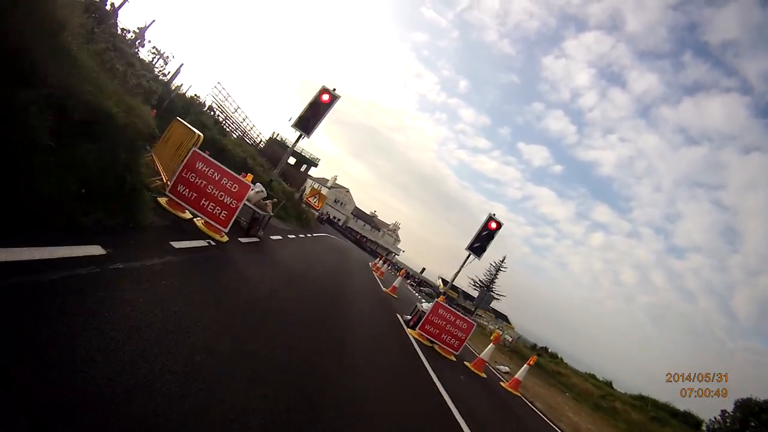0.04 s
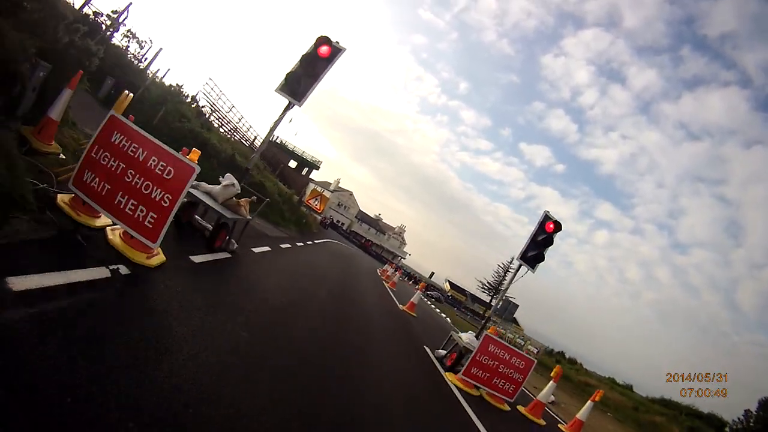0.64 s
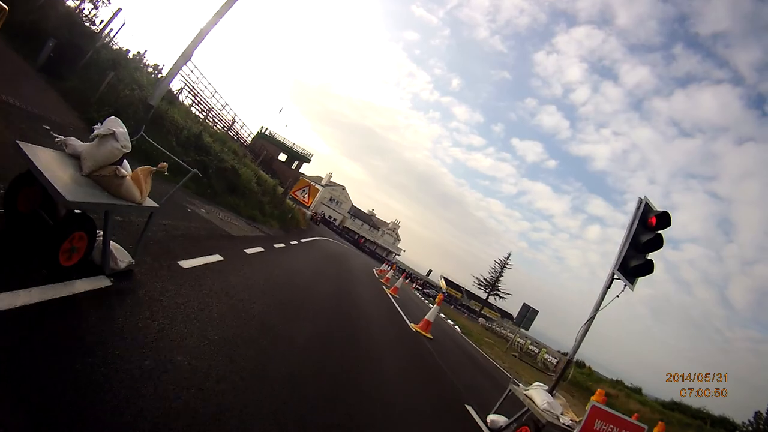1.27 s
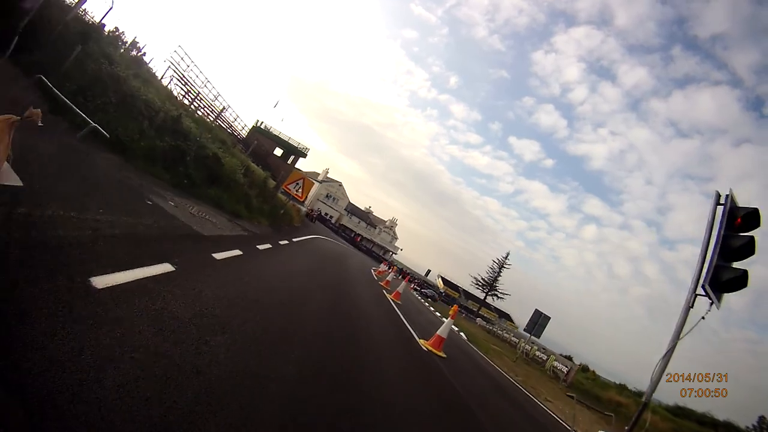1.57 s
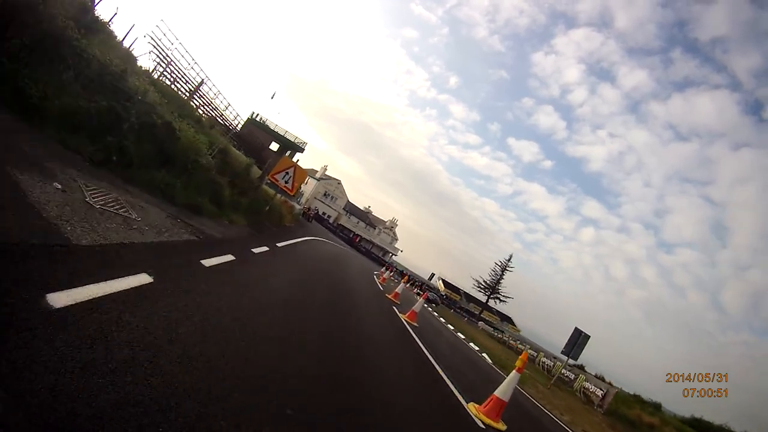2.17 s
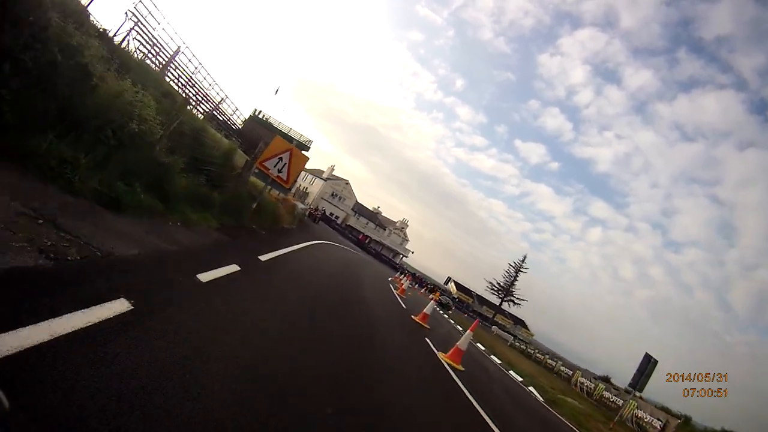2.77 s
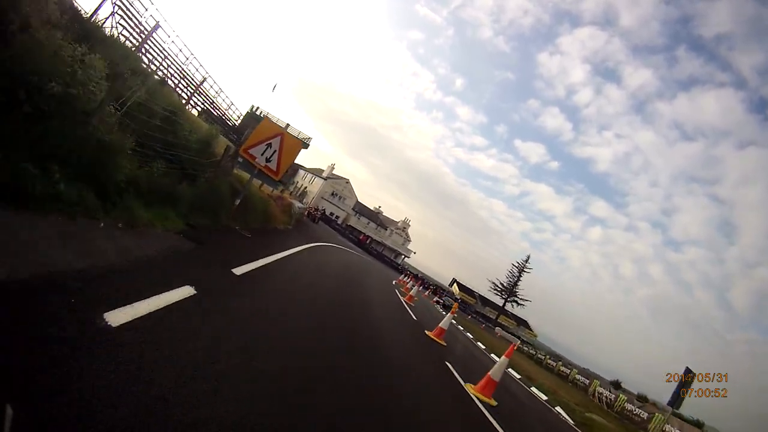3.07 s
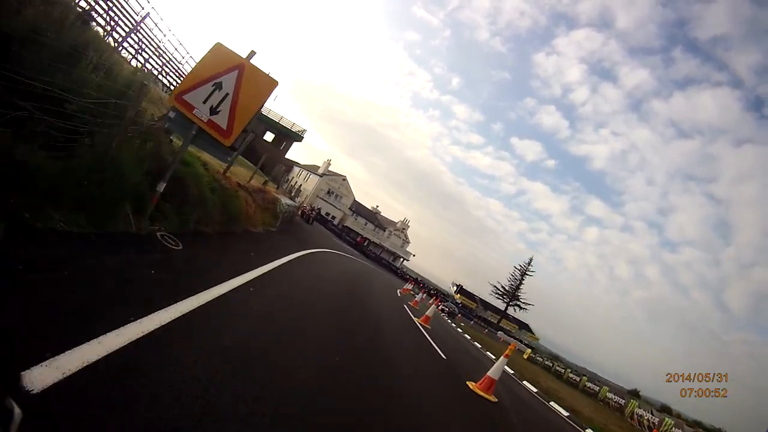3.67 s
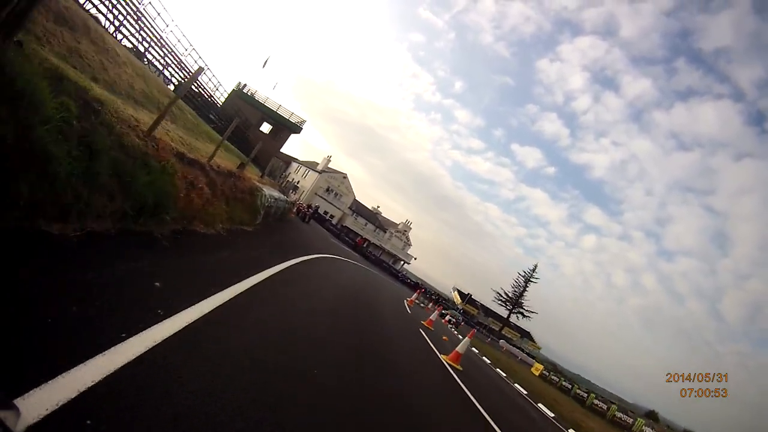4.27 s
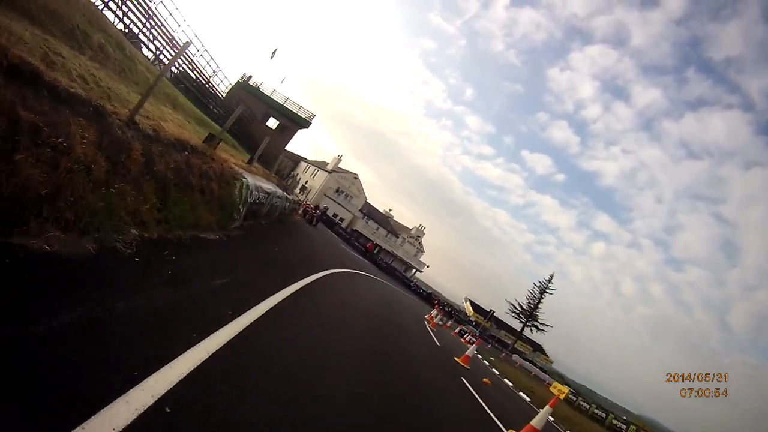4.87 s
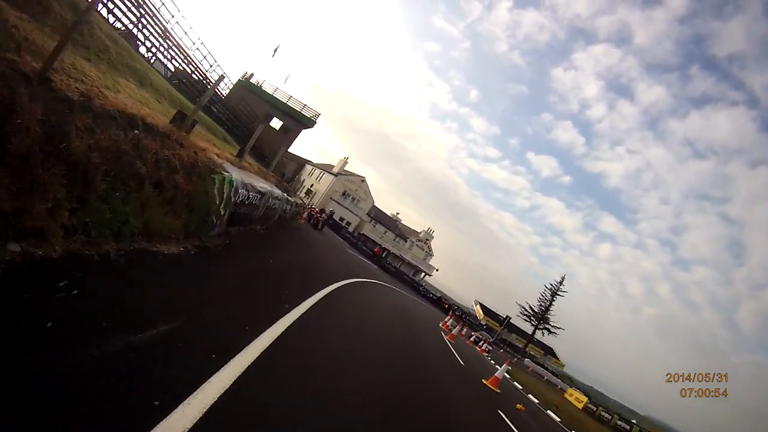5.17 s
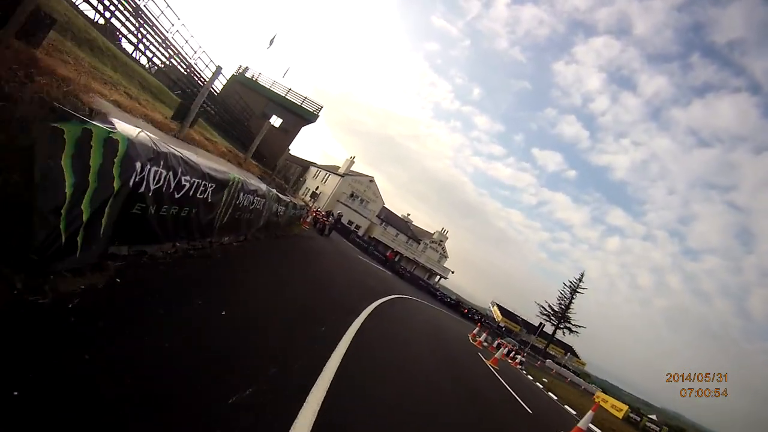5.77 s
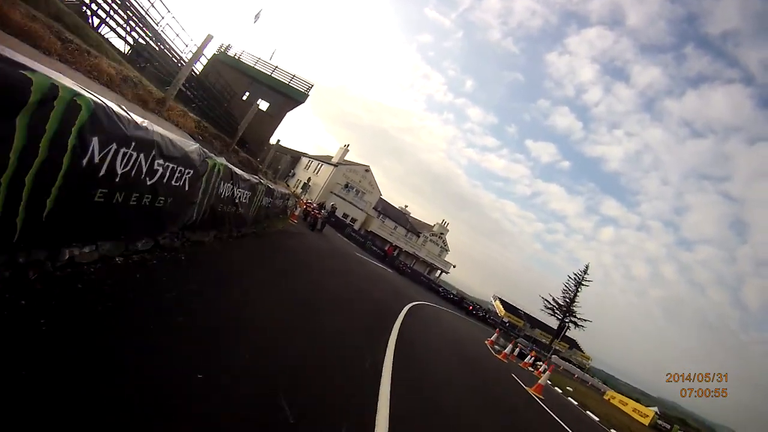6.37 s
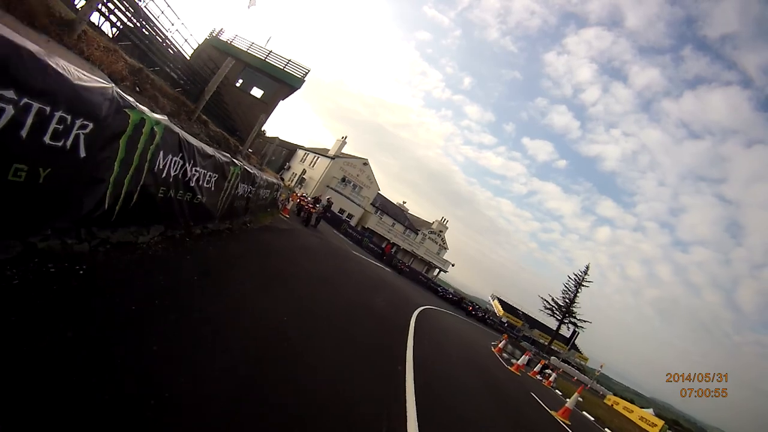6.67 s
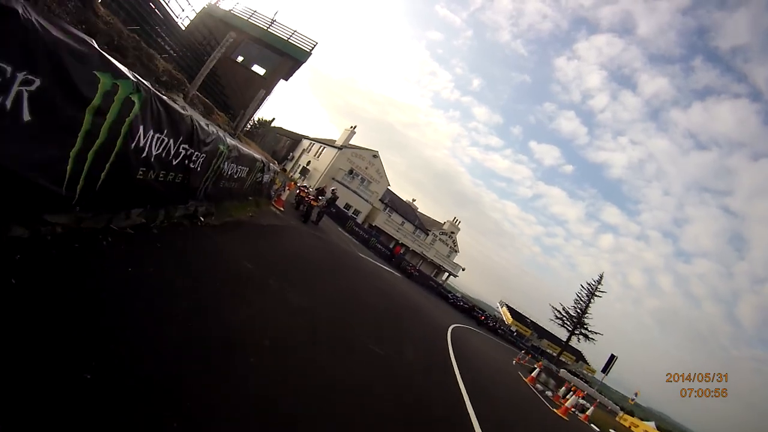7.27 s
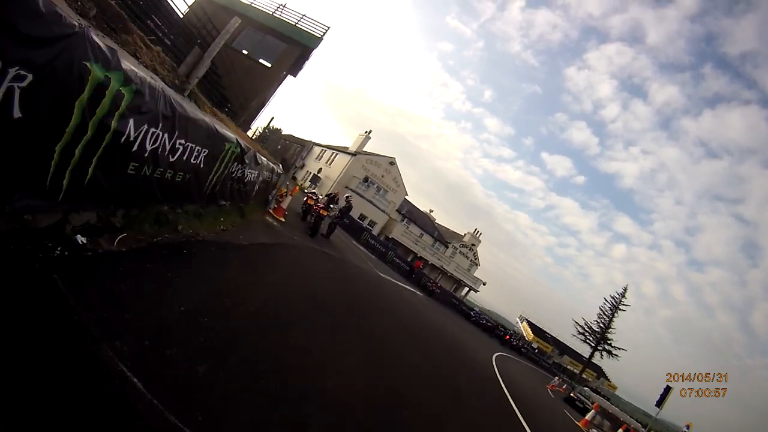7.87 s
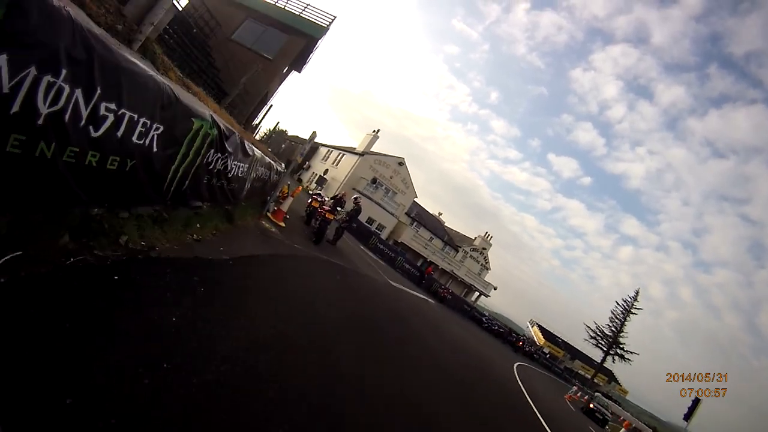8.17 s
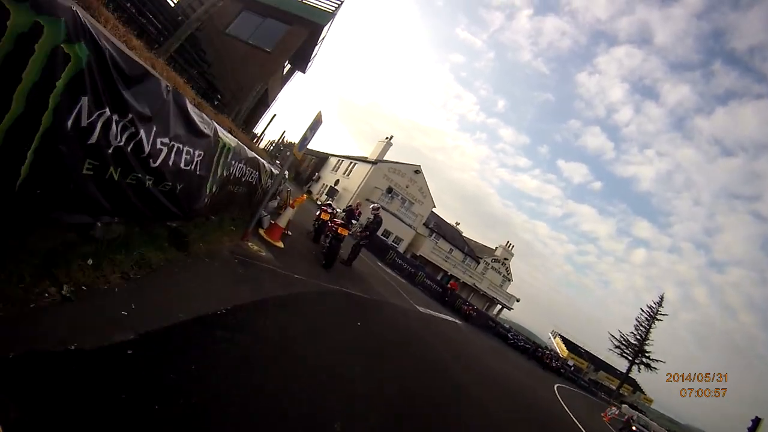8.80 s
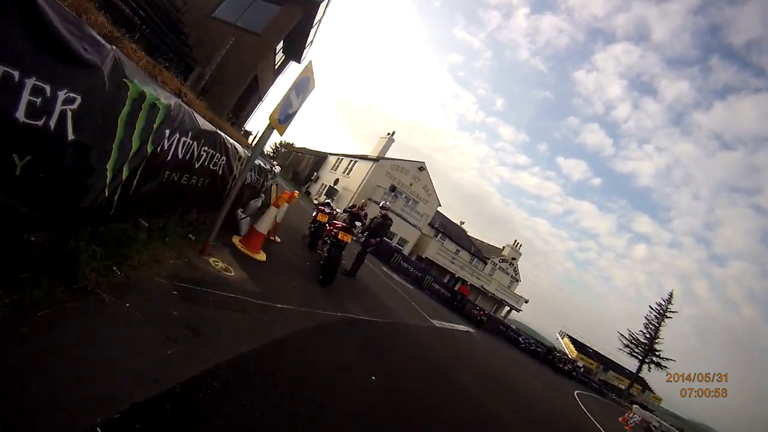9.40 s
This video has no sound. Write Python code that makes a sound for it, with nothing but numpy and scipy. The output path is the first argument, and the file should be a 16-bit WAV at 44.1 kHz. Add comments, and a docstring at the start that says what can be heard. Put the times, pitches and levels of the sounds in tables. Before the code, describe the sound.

Close, deep motorcycle exhaust thumps unevenly, clunks and sputters as the bike slows, then settles into a ticking idle.

```python
"""A motorcycle engine booms and hiccups up close, then sputters as the bike rolls to a stop and idles.
One firing per engine cycle thumps through the exhaust; on a nearly shut throttle some firings fail.
Valves tick, gears rattle, the chain rustles, the gearbox clunks and the brake rasps over a bed of
air and tyre rush. The booms overload a microphone that rides on the bike."""
import sys
import numpy as np
from scipy import signal
from scipy.fft import rfft, irfft, next_fast_len
from scipy.io import wavfile
from scipy.ndimage import map_coordinates

SR = 44100
rng = np.random.default_rng(int(sys.argv[2]) if len(sys.argv) > 2 else 0)


def dump(signal):
    """Clip the signal to [-1, 1] and save it as 16-bit WAV at the path in sys.argv[1]."""
    limited = np.clip(np.atleast_2d(signal).T, -1, 1)
    pcm = np.round(limited * 32767).astype(np.int16)
    wavfile.write(sys.argv[1], SR, pcm)


N = 416294
T = np.arange(-SR // 4, N) / SR  # pre-roll: the engine is already running at time zero


def amp(db):
    """Decibels to gain."""
    return 10 ** (np.asarray(db) / 20)


def unit(x):
    """Scale to rms 1."""
    return x / np.sqrt(np.mean(x ** 2) + 1e-20)


def curve(points, times=T):
    """Read an automation curve of (time, value) points."""
    return np.interp(times, *np.transpose(points))


def white():
    """Fresh white noise."""
    return rng.standard_normal(len(T))


def wobble(rate):
    """A smooth random curve, rate knots a second."""
    knots = rng.standard_normal(int(len(T) * rate / SR) + 4)
    return map_coordinates(knots, [(T - T[0]) * rate], order=2)


def filtered(x, response):
    """x through a complex frequency response."""
    size = next_fast_len(len(x) + SR // 2)
    return irfft(rfft(x, size) * response(np.fft.rfftfreq(size, 1 / SR)), size)[:len(x)]


def coloured(x, eq):
    """x through an EQ of (Hz, dB) points, at rms 1."""
    hz, db = np.transpose(eq)
    return unit(filtered(x, lambda f: amp(np.interp(np.log(f + 1), np.log(hz), db))))


def ring(x, modes):
    """x through a bank of damped resonances."""
    return filtered(x, lambda f: sum(
        np.sign(polarity) * amp(db) * 1j * f * width / (hz * hz - f * f + 1j * f * width)
        for hz, width, db, polarity in modes))


def pulses(times, sizes):
    """A train of impulses."""
    at = np.clip(np.round((times - T[0]) * SR).astype(int), 0, len(T) - 1)
    return np.bincount(at, sizes * np.ones(len(at)), len(T))


def bursts(times, sizes, decay_s):
    """An envelope that jumps at each time and dies away."""
    return signal.lfilter([1], [1, -np.exp(-1 / (decay_s * SR))], pulses(times, sizes))


# Swell and fade of the air and tyre bed: (time [s], level [dB])
RUSH_FADER = [(0, -29), (2, -23), (4, -22.5), (5.5, -27), (7.5, -30), (9.44, -30)]
# Its dark, low-heavy tone: (frequency [Hz], level [dB])
RUSH_EQ = [(15, -12.5), (50, -7.5), (200, 2), (400, -15), (800, -21), (2000, -22), (8000, -48),
           (15000, -61.5)]

def rush(gust_db=2.0):
    """Air and tyre noise swells in gusts and fades as the bike stops."""
    return amp(curve(RUSH_FADER) + gust_db * wobble(13)) * coloured(white(), RUSH_EQ)


# Tone of the chain, with a bite in the upper mids: (frequency [Hz], level [dB])
CHAIN_EQ = [(300, -4), (650, -3), (1100, -6), (2300, -7.5), (3000, -1), (3800, -5.5), (4400, -12.5),
            (5400, -27), (6200, -35.5), (7000, -56.5), (10000, -44), (15000, -57.5)]

def chain(firings, level_db=-32, decay_s=.01, steady=0.76, grain_db=3.5, scatter_db=3):
    """The chain rustles hardest as each firing tugs it."""
    sizes = amp(scatter_db * rng.standard_normal(len(firings)))
    tug = bursts(firings + 0.00083, sizes, decay_s)
    grain = amp(grain_db * wobble(500))
    return amp(level_db) * coloured((steady + tug) * grain * white(), CHAIN_EQ)


# Gear rattle, easing as the bike slows: (time [s], level [dB])
RATTLE_FADER = [(0, -26), (4.8, -28.5), (6.9, -27.5), (7.5, -29)]
# Metallic ring of the gearbox case: (frequency [Hz], width [Hz], level [dB], polarity [+/-])
GEARBOX_MODES = [(946, 50, -11, 1), (1091, 78, -10, -1), (1207, 75, -8.5, 1), (1540, 150, -14, -1),
                 (1820, 92, 0, 1)]

def gears(firings, trim_db=-0.38, scatter_db=3, decay_s=0.0036, steady=0.6, surge=.09, sag=.4):
    """The gear teeth rattle across their slack twice a cycle, as the crank surges and as it sags."""
    times = np.concatenate([firings + share * np.gradient(firings) for share in (surge, sag)])
    rattle = bursts(times, amp(scatter_db * rng.standard_normal(len(times))), decay_s)
    clumps = amp(1.7 * wobble(22))  # the slack differs around the wheel, so the ring is uneven
    teeth = clumps * (steady + rattle) * white()
    return amp(curve(RATTLE_FADER) + trim_db) * unit(ring(teeth, GEARBOX_MODES))


# Tick pattern of the valves: (position [share of the cycle], level [dB])
VALVE_STRIKES = [(.03, 4.5), (.2, 2), (.37, 1), (.52, -1), (0.722, -7.5)]
# Bright ring of the cylinder head: (frequency [Hz], width [Hz], level [dB], polarity [+/-])
HEAD_MODES = [(2240, 234, -13.5, -1), (2702, 120, 0.5, 1), (2810, 343, -4.5, -1), (3041, 108, 1.5, 1),
              (3316, 190, -6, -1), (3420, 300, -9.5, 1), (4217, 153, -11.5, -1), (4456, 140, -14, 1),
              (4830, 400, -17, -1), (5540, 214, -19, 1), (5936, 286, -22, -1)]

def valves(firings, level_db=-30, scatter_db=2, decay_s=0.0067, steady=0.48, snap=9):
    """Valves strike at fixed crank angles: a hard tick and a short chatter ring the cylinder head."""
    period = np.gradient(firings)
    blows = 0
    for share, db in VALVE_STRIKES:
        times = firings + share * period
        sizes = amp(db + scatter_db * rng.standard_normal(len(firings)))
        tick = pulses(times + .0003 * rng.standard_normal(len(times)), sizes)
        blows = blows + snap * tick + bursts(times, sizes, decay_s) * white()
    return amp(level_db) * unit(ring(blows + steady * white(), HEAD_MODES))


# Brake cues: (start [s], length [s], pitch [Hz], level [dB])
BRAKE_RUBS = [(4.345, 0.016, 3670, -30), (4.44, .58, 3320, -33.5), (4.559, 0.054, 3470, -28),
              (4.92, .03, 3370, -30), (7.2, 2.24, 3328, -38)]

def brake(spread_hz=170, attack_share=0.27, release_s=0.027):
    """The pad rubs the disc: a rough, narrow rasp that never settles into a squeal."""
    rasp = 0
    for start, length, hz, db in BRAKE_RUBS:
        grip = np.interp(T - start, [0, attack_share * length, length, length + release_s], [0, 1, 1, 0])
        phase = 2 * np.pi * hz * T
        noise_band = wobble(spread_hz) * np.cos(phase) + wobble(spread_hz) * np.sin(phase)
        rasp = rasp + amp(db) * grip * unit(noise_band)
    return rasp


# Gearbox hits: (time [s], level [dB], length of the rebound chatter [s])
CLUNK_CUES = [(0.579, -10.5, 0), (1.148, -10, 0), (3.55, -7, 0), (3.592, -8.5, 0), (4.265, -4.5, .065),
              (4.466, -8, 0), (5.023, -8.5, 0), (6.031, -12, 0)]

def clunks(gain_db=10, decay_s=0.0051, snap=14, rebound_s=0.016, rebound_db=-5):
    """Slack in the gearbox takes up with a hard blow and a short chatter that ring the whole engine."""
    hits = [(time, db) for time, db, _ in CLUNK_CUES]
    rebounds = [(time + lag + .002 * rng.standard_normal(), db + rebound_db)
                for time, db, length in CLUNK_CUES for lag in np.arange(rebound_s, length, rebound_s)]
    times, levels = np.transpose(hits + rebounds)
    sizes = amp(levels + gain_db)
    blows = snap * pulses(times, sizes) + bursts(times, sizes, decay_s) * white()
    thud = ring(blows, [(1000, 67, -11, 1), (1860, 500, -11, -1)])
    return thud + amp(2) * ring(blows, GEARBOX_MODES) + amp(-7) * ring(blows, HEAD_MODES)


# The revs, wavering and then dropping to idle: (time [s], firing rate [Hz])
REVS = [(0.0, 32.0), (1.37, 40.55), (2.02, 43.61), (2.22, 41.24), (2.46, 47.81), (2.66, 41.66),
        (2.89, 48.35), (3.26, 43.11), (3.38, 47.89), (3.6, 46.95), (3.72, 33.45), (3.96, 42.99),
        (4.19, 36.35), (4.36, 49.02), (5.08, 47.26), (5.16, 36.7), (6.75, 36.95), (7.17, 38.89),
        (7.35, 36.32), (8.28, 35.94), (8.51, 38.91), (8.69, 35.58), (9.0, 39.52), (9.44, 34.26)]
# How far the crank runs ahead and behind, steadier at idle: (time [s], depth [cycles])
HUNT_DEPTH = [(0, .035), (4, .035), (5.5, .03), (9.44, .024)]

def crank(hunt_rate=14, start_phase=.55):
    """Times at which the exhaust valve opens, once a cycle; the speed hunts slightly."""
    cycles = np.cumsum(curve(REVS)) / SR
    cycles = cycles - cycles[-N] + start_phase + curve(HUNT_DEPTH) * wobble(hunt_rate)
    return np.interp(np.arange(np.ceil(cycles[0]), cycles[-1]), cycles, T)


# Single failed firings, each a hiccup in the beat: (time [s])
HICCUP_CUES = [2.125, 2.31, 2.67, 2.85, 3.015, 3.15, 3.215, 3.455, 3.63, 5.152, 5.508, 6.808, 7.02]

def combustion(firings, hiccup=.15, overrun_s=(4.48, 5.14), sputter=0.24, scatter_db=6.5,
               twice_chance=.35, refire_db=.8, pull_db_per_hz=0.17):
    """Strength of each burn: single hiccups, and a sputter on the overrun as firings starve."""
    burn = np.ones(len(firings))
    burn[[np.argmin(abs(firings - time)) for time in HICCUP_CUES]] = hiccup
    # after the downshift the wheel drives the engine: every third or fourth firing starves
    first, last = np.searchsorted(firings, overrun_s)
    gaps = rng.choice([3, 3, 4], last - first)
    starved = first + np.cumsum(gaps) - gaps[0]
    starved_next = starved[rng.random(len(starved)) < twice_chance] + 1
    starved = np.append(starved, starved_next)
    starved = starved[starved < last]
    burn[starved] = sputter * amp(scatter_db * rng.standard_normal(len(starved)))
    # a firing hits harder on fuel left by a failed one, and when it speeds the crank up
    unburnt = 1 - np.roll(burn, 1)
    gained_hz = np.clip(np.gradient(1 / np.gradient(firings)), -2, 2)
    return burn * amp(refire_db * unburnt + pull_db_per_hz * gained_hz)


# Punch of the firings, softer on the overrun and at idle: (time [s], level [dB])
ENGINE_LOAD = [(0, 2), (3.3, 1.14), (4.1, 2), (4.7, -0.4), (5.6, 1.14), (7, 0.37), (9.44, 1)]
# Deep body of the exhaust: (frequency [Hz], width [Hz], level [dB], polarity [+/-])
BOOM_MODES = [(51.82, 9.4, 23, 1), (60.45, 14.27, 25, -1), (79, 24, 7, -1), (128.54, 28.1, 22.5, 1),
              (153.95, 16.7, 15, -1), (189.2, 43.8, 13.5, -1)]
# Upper pipe ring, reached by a sharp puff: (frequency [Hz], width [Hz], level [dB], polarity [+/-])
PIPE_MODES = [(260.2, 15.3, 12, 1), (349, 9.3, -9, 1), (434.7, 18, -4, 1), (516, 4, -0.5, 1)]
# Low gulp of the air box: (frequency [Hz], width [Hz], level [dB], polarity [+/-])
AIRBOX_MODES = [(45.2, 23, 11, 1)]

def exhaust(firings, gain_db=26.5, scatter_db=0.87, puff_hz=300, intake_delay_s=0.00089, idle_hz=37):
    """Firings puff into the pipe, sharper with load and revs; the intake gulps even on a misfire."""
    sizes = amp(curve(ENGINE_LOAD, firings) + scatter_db * rng.standard_normal(len(firings)))
    sizes = sizes * combustion(firings)
    sharpness = sizes ** 2 * (curve(REVS, firings) / idle_hz) ** 2.06
    boom = ring(pulses(firings, sizes), BOOM_MODES)
    pipe = ring(pulses(firings, sharpness), PIPE_MODES)
    gulp = ring(pulses(firings + intake_delay_s, 0.84), AIRBOX_MODES)
    return amp(gain_db) * filtered(boom + pipe + gulp, lambda f: 1 / (1 + 1j * f / puff_hz) ** 2)


def scene():
    """The crank sets the beat for the engine layers; everything mixes to mono at the bike."""
    firings = crank()
    engine = exhaust(firings) + valves(firings) + gears(firings) + chain(firings)
    return (engine + clunks() + brake() + rush())[None, -N:]


def record(dry, mic_hz=6500, shelf_db=-9.0, ceiling=.7, top_hz=15800):
    """The microphone dulls the treble; booms flatten against the input's ceiling and spit short ticks."""
    faded = dry[0] * signal.windows.tukey(N, .001)
    dulled = filtered(faded, lambda f: np.maximum(1 / np.sqrt(1 + (f / mic_hz) ** 10), amp(shelf_db)))
    clipped = np.clip(dulled, -ceiling, ceiling)
    return filtered(clipped - clipped.mean(), lambda f: f < top_hz)[None]


dry = scene()
out = record(dry)
dump(out)
```